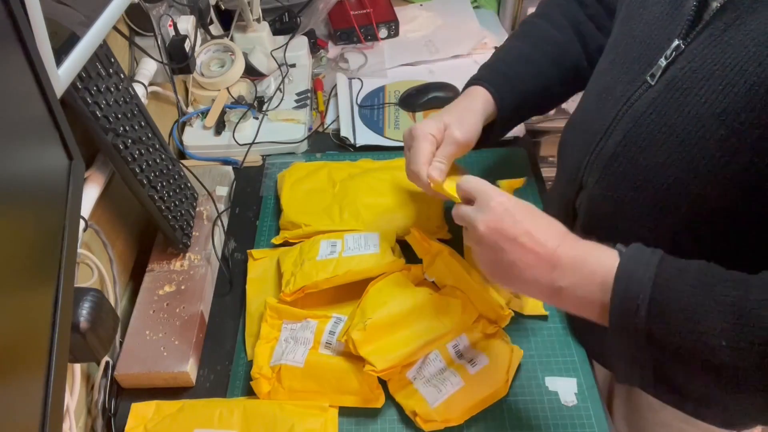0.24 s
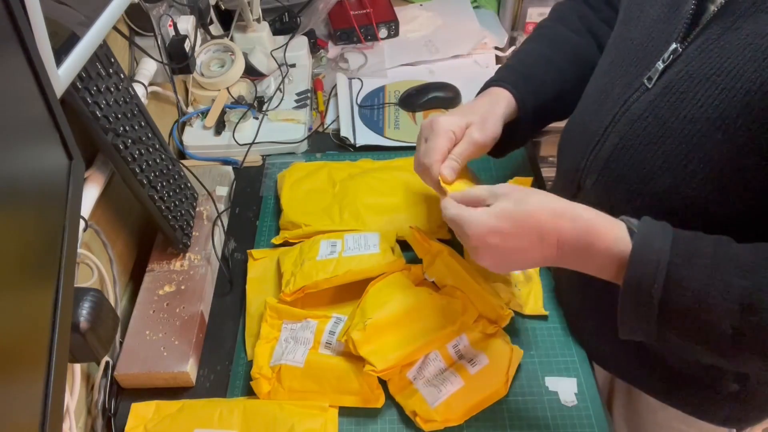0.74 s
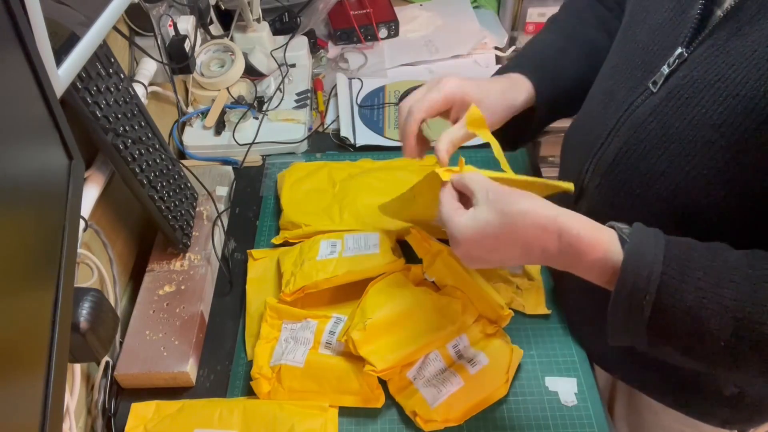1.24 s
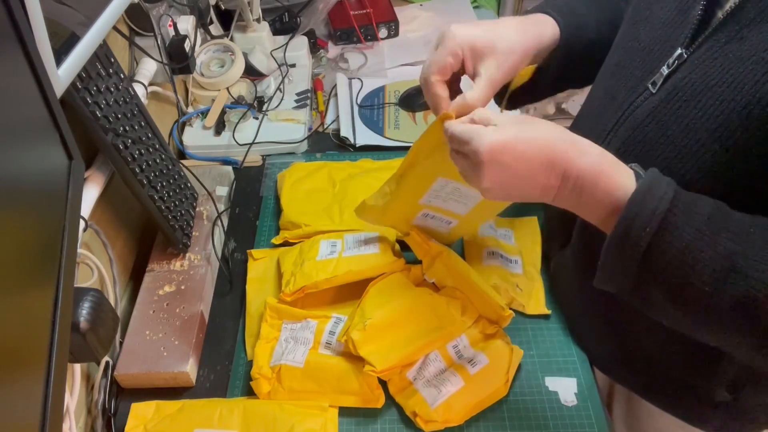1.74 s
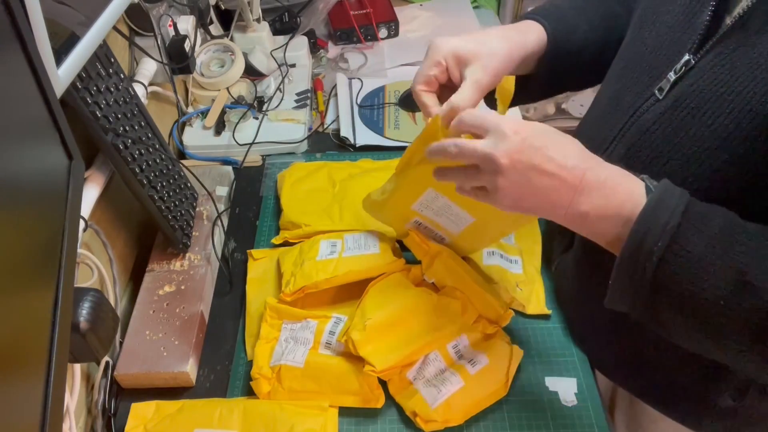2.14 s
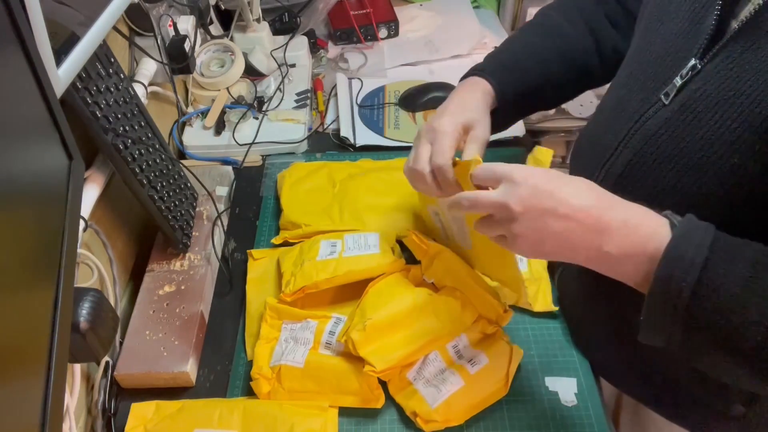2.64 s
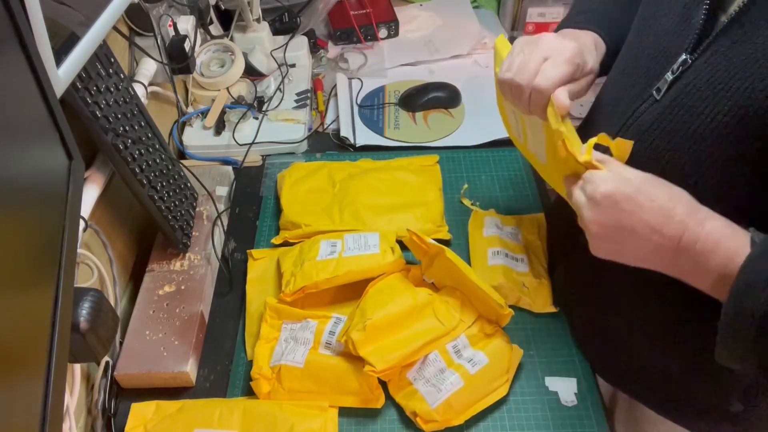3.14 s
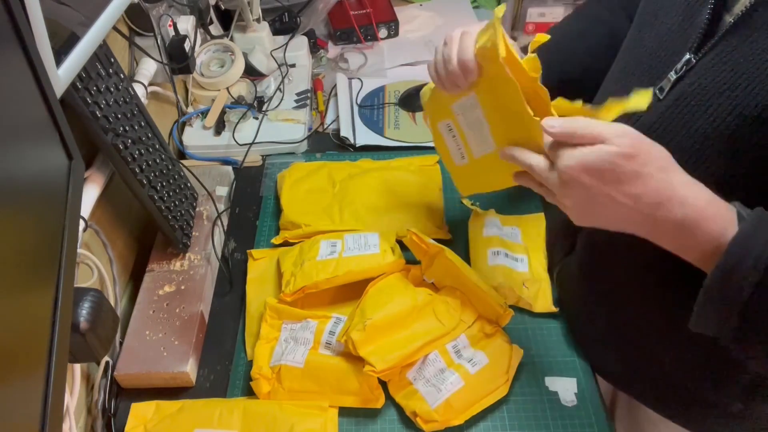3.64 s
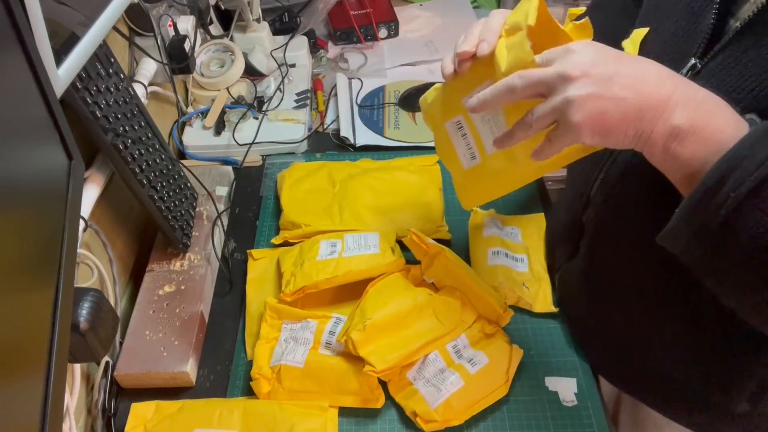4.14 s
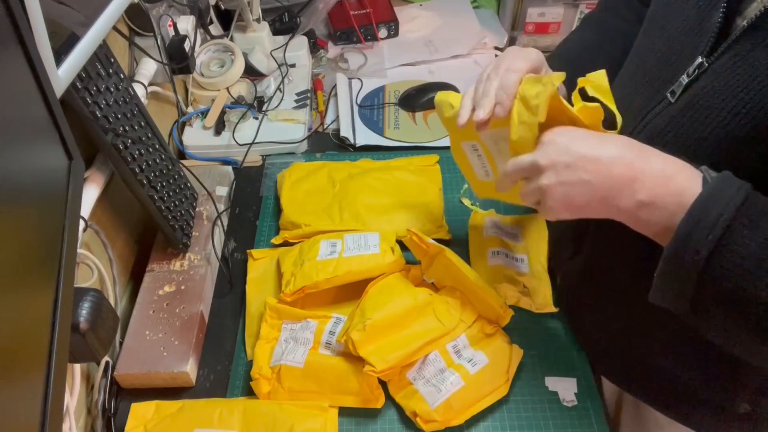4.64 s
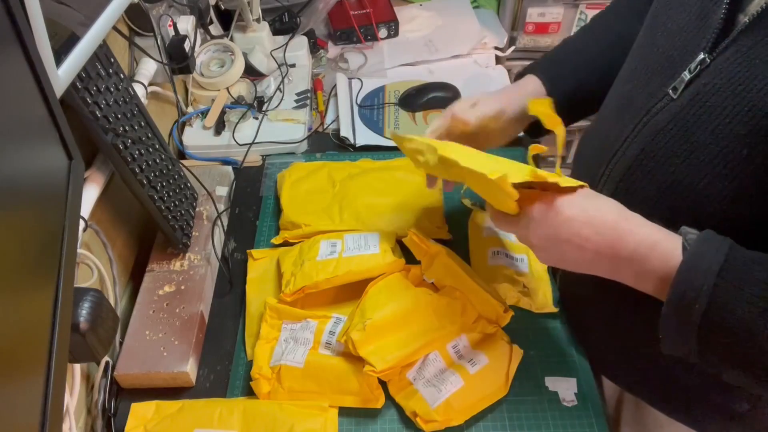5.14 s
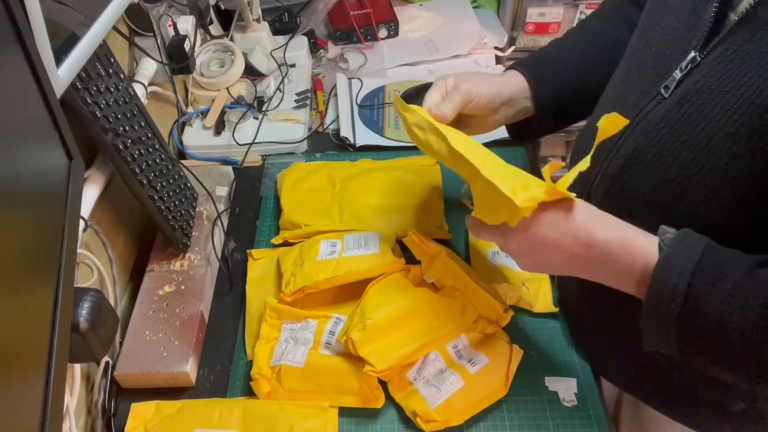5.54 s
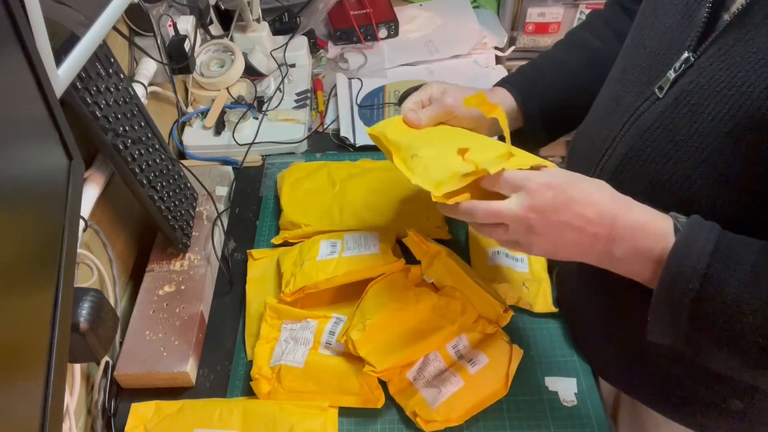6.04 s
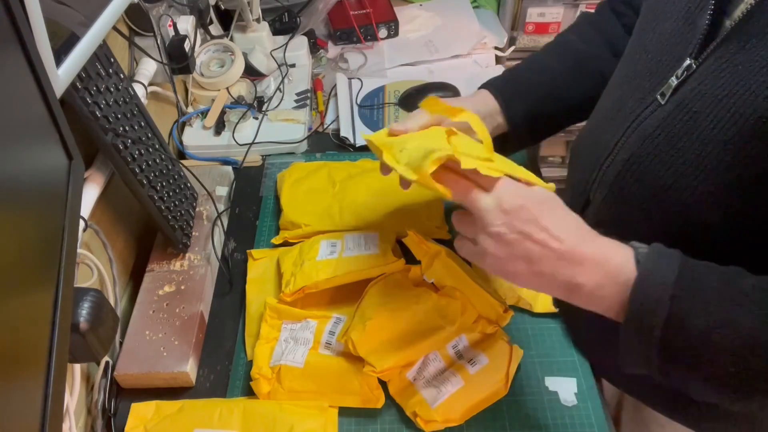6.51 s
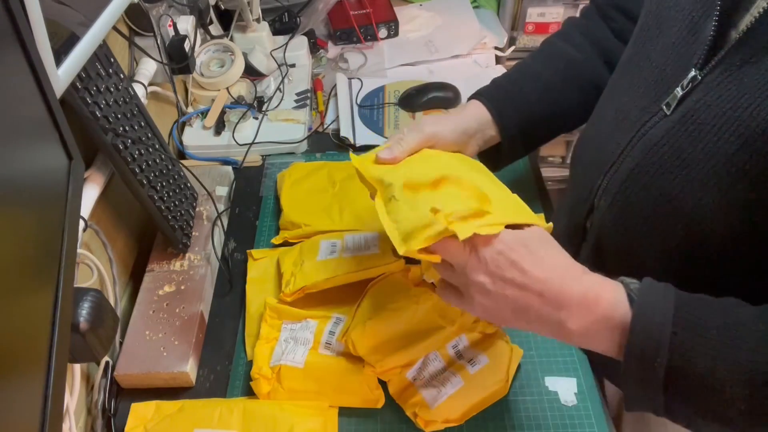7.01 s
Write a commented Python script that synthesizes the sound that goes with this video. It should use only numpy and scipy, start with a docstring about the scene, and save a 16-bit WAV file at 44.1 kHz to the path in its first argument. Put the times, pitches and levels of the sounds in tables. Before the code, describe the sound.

Irregular crinkling of a thin padded plastic pouch, faint at first, then loud with bright snaps and dull thumps, heard closely over a workbench.

```python
"""Dense crackle, loud single snaps and soft booms: two hands tear open and knead a thin plastic mailing bag.
Creases buckling in the film are random clicks that ring small facets; a big crease makes a snap.
The pouch of air inside rings in a few broad modes, and thumps are soft tones that sag in pitch.
A close stereo microphone hears it over a workbench in a small quiet room with a low rumble.
"""
import sys
import numpy as np
from scipy import signal
from scipy.fft import rfft, irfft, next_fast_len
from scipy.io import wavfile
from scipy.ndimage import uniform_filter1d

SR = 44100
rng = np.random.default_rng(int(sys.argv[2]) if len(sys.argv) > 2 else 0)


def write(x):
    x = np.atleast_2d(x).T
    wavfile.write(sys.argv[1], SR, np.round(np.clip(x, -1, 1) * 32767).astype(np.int16))


N = 320607  # length in samples

# The lowest bass swells and sinks. Each row: time in seconds, level in dB.
BASS_SWELL = [(0.0, -59.5), (0.79, -67), (1.07, -58), (6.72, -60), (7.27, -78)]
# Colour of the faint background noise. Each row: frequency in Hz, relative level in dB per Hz.
HISS_COLOUR = [(70, 11.5), (130, 13), (200, -48), (800, -14), (8000, -32)]
HISS_DB = -73.5  # overall level

# Thumps of the whole pouch flipping or knocking.
# Each row: start in seconds, level in dB before a common boost, pitch in Hz it settles to.
THUMPS = [(0.05, -45, 127), (0.114, -45, 432), (0.156, -48, 430), (0.958, -45, 252), (1.803, -39, 250),
          (2.568, -35.5, 135), (2.7826, -32, 257), (3.216, -40, 283), (3.408, -39.5, 402),
          (3.738, -35.5, 427), (4.679, -41, 104), (5.147, -37, 390), (6.727, -35, 283), (6.962, -38, 382)]

# Broad modes of the air and walls of the bag.
# Each row: frequency in Hz before the shape shifts it, width in Hz, level in dB.
POUCH_MODES = [(83, 87, -3), (127, 54, 1), (276, 83, 1), (452.4, 81, 1), (640, 350, -9.5)]
MOUTH_HZ, MOUTH_WIDTH_HZ = 850, 150  # air in the open end of the bag; its pitch shifts around this

# Snaps of big creases. Each row: start in seconds, level in dB, pitch of the buckling facet in Hz,
# treble of the crack in dB and push on the pouch in dB (both relative to the level, before common trims).
SNAPS = [(0.1659, -30.5, 5100, 9, -32), (0.426, -37, 1430, 8, -11), (0.7071, -32, 1280, -47, -15),
         (1.0056, -31, 3340, -29, -10.5), (1.341, -34.5, 2520, -25, -23), (1.354, -31.5, 2230, -30, -32),
         (1.38, -43.5, 1210, -20, 11), (1.8523, -29, 1270, 3, -33), (2.36, -27.5, 2760, -16, -11.5),
         (2.454, -26, 1390, -43, -3.5), (2.471, -30, 1200, -33, -7), (2.537, -21.5, 2720, -10, -23),
         (2.706, -23, 3080, 5, -21), (2.785, -31.5, 1110, -14, 0), (2.9, -14, 2580, -0.5, -15.5),
         (2.977, -24.5, 1290, -12, -6.5), (3.01, -21, 5300, -5.5, -15.5), (3.0891, -22.5, 6750, -19, -14),
         (3.415, -14.5, 2220, -4.5, -9), (3.448, -25.5, 2010, -16, -7), (3.6516, -25, 4160, -7, -21),
         (3.743, -19.5, 2580, 0.5, -10.5), (3.882, -22, 2060, 3, -11.5), (3.887, -27, 3560, 9.5, -1),
         (3.9462, -30.5, 2000, -12, -3), (4.0158, -28.5, 2000, -12, -2.5), (4.319, -27, 1680, -5, -10),
         (4.507, -29, 1370, 4, -7), (4.5399, -21, 3120, 4, 2.5), (4.577, -20.5, 4350, -14, -13.5),
         (4.816, -41, 1390, -13, 9), (4.973, -37, 2850, 3.5, -2.5), (5.132, -26, 2410, -3, -14),
         (5.1522, -21.5, 1970, -25, -5.5), (5.163, -26, 3400, -8, -10), (5.2025, -30, 2600, -8, -18),
         (5.3102, -26.5, 2930, 5, -6.5), (5.325, -28.5, 2800, -11, -6.5), (5.3597, -27.5, 2970, -28, -38),
         (5.395, -35, 3130, 4, -8), (5.568, -34.5, 910, -20, -7), (5.6378, -28.5, 2210, -20, -10),
         (5.706, -36, 2830, -9, 0.5), (5.794, -38.5, 5870, 3, -25), (5.946, -32.5, 2960, 0, -24),
         (6, -28.5, 3440, -12, -33), (6.0888, -23, 2500, 5, -9), (6.299, -43, 955, -6, 8),
         (6.416, -38.5, 5700, 1, 0), (6.4972, -20, 850, -6, -14), (6.531, -27.5, 3460, -7, -26),
         (6.581, -25, 4000, 4.5, -8), (6.5854, -22.5, 3520, 5, -4), (6.6166, -22.5, 3300, -14, -16),
         (6.631, -32.5, 1290, -20, 0), (6.704, -33.5, 4470, -8, -0.5), (6.741, -25, 4250, -6, -6.5),
         (6.779, -25.5, 3340, -3, -9), (6.8025, -33, 2500, 3.5, -10), (6.8529, -27.5, 2820, -12, -5.5),
         (6.946, -29, 3150, -4, -25), (6.9599, -24.5, 3200, -4, -9), (6.997, -20.5, 3500, -2.5, -10.5),
         (7.1113, -26, 1580, -14, -21), (7.123, -16.5, 3180, -7, -10), (7.217, -19.5, 2300, -11, -9.5)]

# Separate strokes of the hands. Each row: time of full force in seconds, time held in seconds,
# effort in dB, then relative to effort: sliding fizz in dB, broad folds in dB, pouch flexing in dB.
# Fizz and folds are trimmed again when mixed; flexing is used as it is.
HAND_STROKES = [(0.125, 0.089, -45, 7.5, -7, -2.5), (.37, 0.061, -55.5, 0.5, 1, 6.5),
                (0.893, 0.055, -54, -19, 7.5, -8), (1.01, 0.016, -57, 2.5, 7, 9),
                (1.1, 0.063, -52.5, -27, 3, -8), (1.245, 0.11, -44, -8.5, -8.5, -16),
                (1.4, 0.16, -47.5, 0.5, -0.5, -7), (1.856, 0.033, -36, 0.5, 1, -5),
                (2.05, 0.017, -49, -5, 3.5, -2), (2.274, 0.1, -43.5, -3.5, 0.5, -2.5),
                (2.58, 0.16, -50, -15, 1.5, -7), (2.8, 0.11, -46, 3, -1, -1),
                (3.106, 0.055, -39.5, 4, -0.5, -4.5), (3.23, 0.0082, -51, -2, 3, 10.5),
                (3.329, 0.017, -46.5, 5.5, 1, 1), (3.421, 0.12, -37, -1, -5.5, -11),
                (3.65, 0.018, -45.5, 7, 0, -1.5), (3.865, 0.094, -51, 8.5, 2.5, 1),
                (4.004, 0.045, -46, 4.5, 0.5, -4.5), (4.248, 0.074, -52.5, 2, 3.5, -0.5),
                (4.499, 0.035, -49, 1, -15, 3.5), (4.854, 0.059, -50, 3, 1.5, 0),
                (5.015, 0.034, -51, 3, 5.5, -2), (5.139, 0.0056, -41.5, -0.5, -6, 0.5),
                (5.214, 0.05, -40.5, -4, -3.5, -8.5), (5.315, 0.0018, -36.5, -5, -9, -4),
                (5.4, 0.093, -44, -2, -3, -3), (5.712, 0.097, -46, 1.5, 0, -6),
                (5.911, 0.098, -45.5, -3.5, -0.5, -9.5), (6.084, 0.075, -44, 0.5, -2, 3.5),
                (6.287, 0.029, -45.5, 2.5, -5, 4.5), (6.426, 0.1, -45, 5, -1.5, 0),
                (6.56, 0.095, -44.5, -3, -4, -14), (6.717, 0.042, -42, 4, -2, -13),
                (6.86, 0.07, -48, 2, 1.5, -3), (6.97, 0.13, -44.5, 1, -1, -1.5),
                (7.21, 0.029, -41.5, -1.5, -5.5, -7)]
RISE_DB_PER_S, FALL_DB_PER_S = 402, 401  # how fast a stroke builds and lets go
SAG_DB_PER_S = 12  # the tiring of a stroke, which goes on during its fall as well

# The film never rests: rustle between the strokes.
# Each row: time in seconds, level in dB before fizz and folds are trimmed.
RUSTLE = [(0, -53.5), (.56, -65), (.8, -55.5), (1.6, -61), (2.2, -56), (2.5, -50), (3.0, -53), (3.6, -54),
          (4.17, -60.5), (4.65, -51), (4.96, -59.5), (5.6, -54), (6.37, -55), (7.27, -51.5)]
RUSTLE_FIZZ_DB, RUSTLE_FOLDS_DB, RUSTLE_FLEX_DB = 2, -1.5, -3.5  # relative to the rustle level, as above

# Tone colour of the crackling film. Each row: frequency in Hz, level in dB.
FILM_COLOUR = [(500, -6), (1200, -15.5), (2100, -4.5), (3500, -3.5), (6000, -11.5), (9000, -16.5),
               (11500, -21.5)]
# Colour of the mid signal: the two ports cancel in the top treble. Each row: frequency in Hz, level in dB.
MID_COLOUR = [(12200, 0), (12900, -33), (16000, -25)]
# Colour of the side signal, which sets the stereo width. Each row: frequency in Hz, level in dB.
SIDE_COLOUR = [(60, -24), (180, -20), (400, -11.5), (800, -7.5), (1400, -8.5), (2300, -2.5), (6500, -11.5),
               (11000, 1)]
EDGE_HZ = 15900  # upper band limit


def gain_of(db):
    """Turns dB into an amplitude factor."""
    return 10 ** (np.asarray(db) / 20)


def decay(t, t60):
    """Fades by 60 dB in t60 seconds."""
    return gain_of(-60 * t / t60)


def evened(x):
    """Scales to an average (RMS) level of 1."""
    return x / np.sqrt(np.mean(x ** 2) + 1e-20)


def peaked(x):
    """Scales to a peak of 1."""
    return x / abs(x).max()


def follow(rows):
    """Columns of a table, joined by straight lines in time."""
    s, *columns = np.transpose(rows)
    return [np.interp(np.arange(N) / SR, s, c) for c in columns]


def read(points, hz):
    """Reads a table of levels between its points, along a logarithmic frequency scale."""
    f, value = np.transpose(points)
    return np.interp(np.log(hz + 1), np.log(f + 1), value)


def coloured(x, points):
    """Filters by a spectrum in dB."""
    size = next_fast_len(N)
    gains = gain_of(read(points, np.fft.rfftfreq(size, 1 / SR)))
    return irfft(rfft(x, size) * gains, size)[..., :N]


def ring(x, hz, width):
    """Two-pole resonance of peak gain near 1; a narrower width rings longer."""
    r = np.exp(-np.pi * width / SR)
    feedback = [1, -2 * r * np.cos(2 * np.pi * hz / SR), r * r]
    return (1 - r * r) / 2 * signal.lfilter([1, 0, -1], feedback, x)


def rumble():
    """Deep room air round one broad note, and a faint noise of bass and hiss."""
    deep_noise, hiss_noise = rng.standard_normal((2, N))
    deep = ring(ring(deep_noise, 46.2, 10.2), 94, 96)
    hiss = evened(coloured(hiss_noise, HISS_COLOUR))
    return gain_of(follow(BASS_SWELL)[0]) * evened(deep) + gain_of(HISS_DB) * hiss


def scatter(x, t60):
    """Sparse reflections of random sign from bench and clutter, energy 1."""
    t = np.arange(3000) / SR
    taps = rng.choice([-1., 1.], len(t)) * (rng.random(len(t)) < .07) * decay(t, t60)
    return signal.oaconvolve(x, taps / np.linalg.norm(taps))[:N]


def shifting_paths(x):
    """Hands and film keep moving, so the sideways paths change phase band by band from moment to moment."""
    z = signal.stft(x, nperseg=256, noverlap=192)[2]
    a, b = rng.standard_normal((2, *z.shape))
    # smooth over 3 bands and 12 frames, so that the phase wanders gradually
    real = uniform_filter1d(uniform_filter1d(a, size=3, axis=0), size=12, axis=1)
    imaginary = uniform_filter1d(uniform_filter1d(b, size=3, axis=0), size=12, axis=1)
    turn = real + 1j * imaginary
    return signal.istft(z * turn / abs(turn), nperseg=256, noverlap=192)[1][:N]


def thumps():
    """A few soft cycles that sag in pitch as the pouch settles, with a rough crunch on top."""
    t, out = np.arange(6000) / SR, np.zeros(N + 6000)
    grit = rng.standard_normal((len(THUMPS), len(t)))
    draws = rng.uniform(-0.71, 1, (len(THUMPS), 2))
    rise = 1 - np.exp(-(t / 0.0034) ** 2)
    for (s, db, hz), (sign, wobble), noise in zip(THUMPS, draws, grit):
        turns = hz * (t + 0.0014 * (1 - np.exp(-t / 0.0024)))  # cycles so far: fast at first
        swing = np.sin(2 * np.pi * turns)
        swing += 0.68 * np.sin(2 * np.pi * (1.34 + 0.35 * wobble) * turns)
        crunch = evened(ring(noise, 2.6 * hz, 2.2 * hz)) * gain_of(-4.5) * decay(t, .06)
        envelope = gain_of(db + 8.0) * decay(t, 0.066) * rise
        out[round(s * SR):][:len(t)] += np.sign(sign) * envelope * (swing + crunch)
    return out[:N]


def pouch(x, shape=1):
    """The air and walls of the bag ring in a few broad modes, higher or lower as its shape changes."""
    modes = enumerate(POUCH_MODES)
    return sum((-1) ** k * gain_of(db) * ring(x, shape * hz, width) for k, (hz, width, db) in modes)


def snaps():
    """A big crease lets go: a broad crack, a shower of after-clicks ringing the facet, a push on the pouch."""
    t = np.arange(3000) / SR
    noise = rng.standard_normal((len(SNAPS), 2, len(t)))
    chance = rng.random((len(SNAPS), len(t)))
    broad, crack, rung = np.zeros((3, N + len(t)))
    for (s, db, hz, treble_db, push_db), (a, b), c in zip(SNAPS, noise, chance):
        at = slice(round(s * SR), round(s * SR) + len(t))
        after_clicks = a * (0.07 + 0.6 * (c < .03)) * decay(t, 0.055)  # few strong grains over weak noise
        shower = (after_clicks + 1.2 * a * decay(t, .009)) * (1 - np.exp(-t / 0.0005))
        own_click = 1.6 * np.sign(a[0]) * (np.arange(len(t)) == 40)  # the crease itself
        shower = peaked(shower + own_click)
        push = b * decay(t, 0.054) * (1 - np.exp(-t / 0.00018))
        shape = 0.89 + 0.22 * c[0]  # the bag's shape differs from snap to snap
        body = pouch(push, shape) + 1.6 * ring(push, shape * MOUTH_HZ, MOUTH_WIDTH_HZ)
        broad[at] += gain_of(db) * shower
        crack[at] += gain_of(db + treble_db) * decay(t, 0.06) * shower
        rung[at] += gain_of(db - 1.0) * peaked(ring(shower, hz, 0.33 * hz))
        rung[at] += gain_of(db + push_db + 3.0) * peaked(body)
    treble_filter = signal.butter(2, 4000, "high", fs=SR, output="sos")
    middle_filter = signal.butter(2, [1000, 4500], "band", fs=SR, output="sos")
    bright = signal.sosfilt(treble_filter, crack[:N])
    middle = signal.sosfilt(middle_filter, broad[:N])
    return coloured(gain_of(20.0) * bright, FILM_COLOUR) + gain_of(-1.0) * middle + rung[:N]


def clicks(per_s, spread_db, clump_db, clump):
    """Random clicks, mostly small, that come in clumps as one fold releases the next."""
    size_db = spread_db * np.minimum(rng.exponential(1, N), 5) + clump_db * clump
    return gain_of(size_db) * (rng.random(N) < per_s / SR) * rng.choice([-1., 1.], N)


def facets(train, low_hz, high_hz, cycles, patchy_db, count):
    """Each click rings one facet of film for a few cycles; sizes of facet come into play and drop out."""
    which, out = rng.integers(0, count, N), np.zeros(N)
    play = rng.standard_normal((count, N // 1000 + 2))  # one value per 1000 samples
    play = evened(uniform_filter1d(play, size=3, axis=1))
    for k, hz in enumerate(np.geomspace(low_hz, high_hz, count)):
        active_db = patchy_db * np.interp(np.arange(N) / 1000, np.arange(play.shape[1]), play[k])
        out += ring(train * gain_of(active_db) * (which == k), hz, hz / cycles) / np.sqrt(hz)
    return out


def strokes():
    """Creases, fizz, folds and flexing: strokes build, hold and let go over a rustle that rises and falls."""
    s, held, effort_db, *layers_db = np.array(HAND_STROKES).T[:, :, None]
    t = np.arange(0, N, 32) / SR  # a coarse time grid is enough
    build_db = RISE_DB_PER_S * np.maximum(s - t, 0)
    let_go_db = FALL_DB_PER_S * np.maximum(t - s - held, 0)
    tiring_db = SAG_DB_PER_S * np.maximum(t - s, 0)
    force_db = effort_db - build_db - let_go_db - tiring_db
    layer_offsets_db = np.array([[0], [RUSTLE_FIZZ_DB], [RUSTLE_FOLDS_DB], [RUSTLE_FLEX_DB]])
    rest_db = follow(RUSTLE)[0] + layer_offsets_db
    powers = [(gain_of(force_db + db) ** 2).sum(0) for db in [0, *layers_db]]
    worked = [np.interp(np.arange(N) / SR, t, power) for power in powers]
    return np.sqrt(worked + gain_of(rest_db) ** 2)


def kneading():
    """Creases, fizz, single ticks, broad folds and pouch flexing follow the hands, in clumps."""
    effort, slide, bend, squeeze = strokes()
    fading = np.exp(-np.arange(2000) / (0.013 * SR))  # clumps start at once and thin out
    slips = rng.standard_normal((5, N)) * (rng.random((5, N)) < 150 / SR)
    shared_slips = 0.63 * slips[0] + slips[1:]  # the layers partly clump together
    clump = np.clip(evened(signal.oaconvolve(shared_slips, fading[None], axes=1)[:, :N]), -2, 2)

    creases = facets(clicks(2600, 2.6, 1.5, clump[0]), 1700, 5600, 7.0, 3.5, count=12)
    fizz = facets(clicks(6000, 1.65, 2.56, clump[1]), 6270, 14800, 3.1, 2.9, count=12)
    ticks = facets(clicks(150, 2.4, 1.0, clump[0]), 1200, 7800, 3.0, .1, count=10)
    film = effort * evened(creases) + slide * gain_of(12.0) * evened(fizz)
    film += effort * gain_of(-2.5) * evened(ticks)

    flips = clicks(600, 1.5, 3.5, clump[2])
    gape = clump[3] > 0  # the opening is now wider, now pinched
    mouth = ring(flips * gape, 1.1 * MOUTH_HZ, MOUTH_WIDTH_HZ)
    mouth += ring(flips * ~gape, 0.9 * MOUTH_HZ, MOUTH_WIDTH_HZ)
    folds = evened(facets(flips, 680, 1900, 9.0, 2.5, count=8)) + 0.8 * evened(mouth)

    bends = clicks(750, 2.74, 4.9, clump[3])
    taut = clump[1] > 0  # the pouch is now fuller, now flatter
    flex = pouch(bends * taut, 1.05) + pouch(bends * ~taut, 0.94)
    low = bend * gain_of(-2.5) * evened(folds) + squeeze * evened(flex)
    return coloured(film, FILM_COLOUR) + low


def scene():
    """Mid and side of the microphone pair; the side hears shifting paths and a phase lag between the ports."""
    bag = kneading() + snaps() + thumps()
    air = bag + gain_of(-7.5) * scatter(bag, 0.079) + rumble()
    lag = signal.hilbert(air, next_fast_len(N)).imag[:N]  # a quarter-cycle lag at every frequency
    mid = coloured(air, MID_COLOUR)
    side = coloured(0.62 * lag + 1.21 * shifting_paths(air), SIDE_COLOUR)
    return np.array([mid + side, mid - side])


def record(dry):
    """Bass roll-off of the microphone, then the band limit."""
    dry = signal.sosfilt(signal.butter(6, 37, "high", fs=SR, output="sos"), dry)
    band_limit = signal.firwin(511, EDGE_HZ, window=("kaiser", 9), fs=SR)
    return signal.oaconvolve(dry, band_limit[None], "same")


dry = scene()
out = record(dry)
write(out)
```